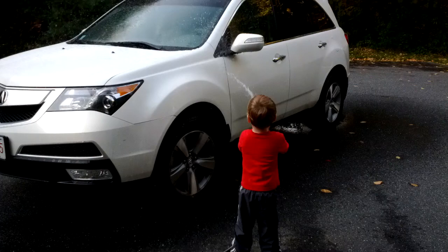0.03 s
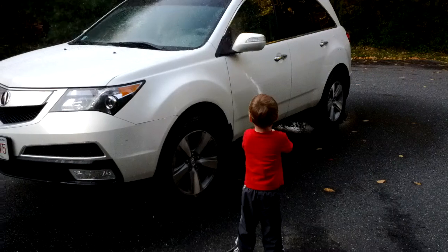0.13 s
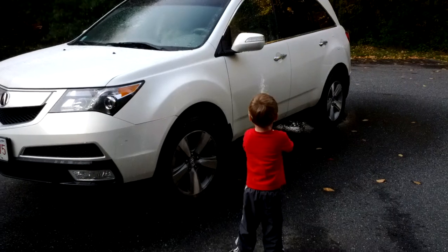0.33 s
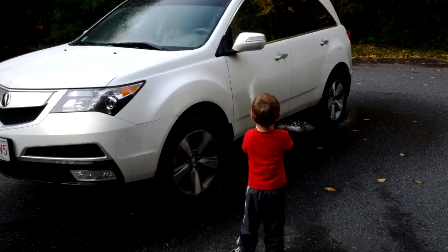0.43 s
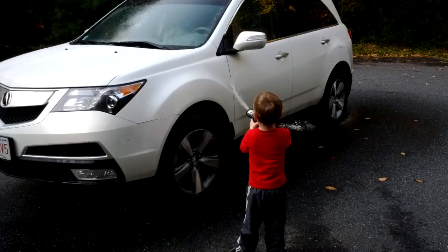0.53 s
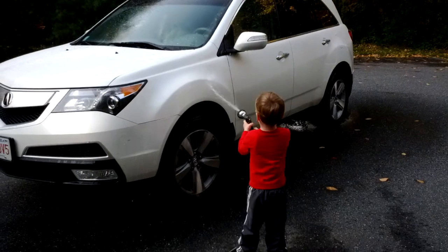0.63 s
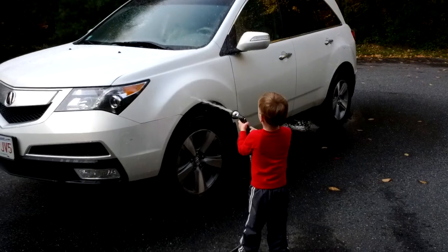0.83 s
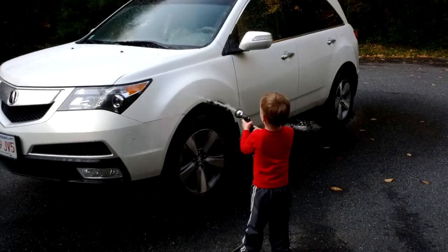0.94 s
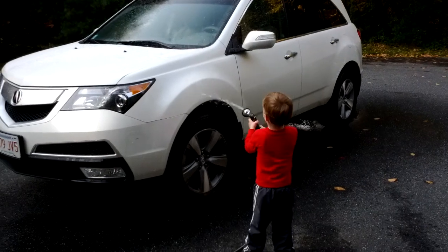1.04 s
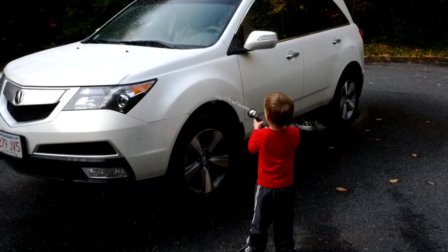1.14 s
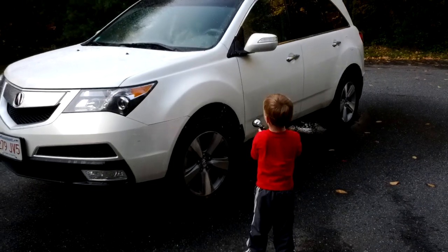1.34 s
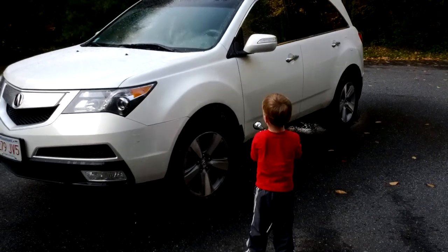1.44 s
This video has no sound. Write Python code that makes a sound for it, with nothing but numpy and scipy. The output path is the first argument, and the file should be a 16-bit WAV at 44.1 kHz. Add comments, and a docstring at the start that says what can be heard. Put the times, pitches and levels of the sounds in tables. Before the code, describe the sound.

A hose jet hits car panels, first a hollow, hissy patter on the door, then louder metallic drumming on the fender, finally weak drips in the wheel arch. Open air, close microphone, soft low rumble.

```python
"""A garden hose sprays a parked car outdoors, over a low rumble.
Drops burst on the paint in a bright, uneven crackle of noise puffs and tiny ringing bubbles over mist.
The jet swings from the door to the front fender, which drums under it, then into the wheel arch,
where only a thin spatter is left. Panels are resonant modes struck by random drops.
Fat drops ping and slugs of water slap the arch's rim; the rumble is filtered noise."""
import sys
import numpy as np
from scipy import signal
from scipy.fft import rfft, irfft, next_fast_len
from scipy.io import wavfile

SR = 44100
rng = np.random.default_rng(int(sys.argv[2]) if len(sys.argv) > 2 else 0)


def persist_wave(psi):
    """Save psi, clipped to +-1, as 16-bit WAV."""
    counts = np.round(np.clip(psi, -1, 1) * 32767).astype(np.int16)
    wavfile.write(sys.argv[1], SR, np.atleast_2d(counts).T)


N = 66150
T = np.arange(N) / SR


def from_db(db):
    """Decibels to gain."""
    return 10 ** (np.asarray(db) / 20)


def rms_one(x):
    """Scale to rms 1."""
    return x / np.sqrt(np.mean(x ** 2) + 1e-20)


def level(rows):
    """Gain per sample from a (time_s, level_db) curve."""
    return from_db(np.interp(T, *np.transpose(rows)))


def noise():
    """White noise of rms about 1."""
    return rng.standard_normal(N)


def drift(hz):
    """Slow random wander of rms 1: noise through two equal one-pole lowpasses."""
    r = np.exp(-2 * np.pi * hz / SR)
    wander = signal.lfilter([1], [1, -2 * r, r * r], rng.standard_normal(2 * N))
    return rms_one(wander[N:])  # first half is run-in


def colour(x, points):
    """Minimum-phase filter through (freq_hz, density_db) points; white noise keeps its power."""
    size = 2 * next_fast_len(N)
    point_hz, point_db = np.transpose(points)
    bin_hz = np.arange(size // 2 + 1) * SR / size
    gain = rms_one(from_db(np.interp(np.log(bin_hz + 1), np.log(point_hz), point_db)))
    # folding the cepstrum makes the filter causal
    cepstrum = irfft(np.log(gain))
    cepstrum[1:size // 2] *= 2
    cepstrum[size // 2 + 1:] = 0
    return irfft(rfft(x, size) * np.exp(rfft(cepstrum)))[:N]


DROP_SPREAD_DB, SIZE_LIMIT = 3, 2.4  # size spread; largest drop in spreads


def impacts(per_s, spread_db):
    """Random impacts of uneven size, with mean power about 1 at any rate."""
    chance = np.clip(per_s / SR, 1e-6, 1)
    sizes = rms_one(from_db(spread_db * np.minimum(noise(), SIZE_LIMIT)))
    return (rng.random(N) < chance) * sizes / np.sqrt(chance)


def random_signs():
    """Random polarity per sample."""
    return rng.choice([-1, 1], N)


def bursts(hits, decay_s):
    """Each impact sets off a short dying puff of noise of the same mean energy."""
    r = np.exp(-2 / (decay_s * SR))  # power decays twice as fast as amplitude
    power = signal.lfilter([1 - r], [1, -r], hits ** 2 + 1e-18)
    return np.sqrt(power) * noise()


def resonate(x, hz, t60_s):
    """Two-pole resonance; returns its output and pole radius."""
    r = from_db(-60 / (t60_s * SR))
    w = 2 * np.pi * hz / SR
    return signal.lfilter([1, 0, -1], [1, -2 * r * np.cos(w), r * r], x), r


# how strongly the jet breaks into clumps: time_s, spread_db
CLUMPING = [(.12, 1.5), (.45, 2.5), (.7, 1.46), (1, 2), (1.2, 3), (1.5, 2.1)]


def jet_clumps():
    """The jet breaks into clumps: a log-level wander of varying spread, rms 1."""
    return rms_one(level(CLUMPING) ** drift(hz=55))


PING_CYCLES = 28.5  # cycles to fall 60 dB


def pings(per_s):
    """Tiny bubbles in the water film ring briefly, each at one of 14 pitches."""
    hits = impacts(per_s, DROP_SPREAD_DB) * random_signs()
    pitches_hz = np.linspace(4500, 15000, 14)
    dealt = rng.integers(0, len(pitches_hz), N)
    out = np.zeros(N)
    for k, hz in enumerate(pitches_hz):
        ring, r = resonate(hits * (dealt == k) + 1e-18, hz, PING_CYCLES / hz)
        out += np.sqrt(1 - r * r) * ring  # evens out the energy across pitches
    return out / 2


# spatter on the paint, before the layer levels: time_s, level_db
SPATTER_LEVEL = [(.12, -29), (.19, -29.5), (.3, -29.5), (.42, -25.5), (.49, -24.5), (.54, -25), (.66, -21),
                 (.78, -21.5), (.85, -24), (.9, -23), (.95, -24.5), (1.03, -24.5), (1.15, -31), (1.22, -36),
                 (1.28, -44), (1.37, -40.5), (1.42, -46.5), (1.455, -41.5), (1.5, -46)]
# relative spectrum of bursting drops: freq_hz, density_db
DROP_COLOUR = [(300, -32.5), (2000, -32), (2700, -25.5), (4000, -18.5), (5200, -17), (7000, -9.5),
               (8400, -9), (10200, 0), (11300, -1), (12500, -4.5), (14200, -12.5), (16000, -18)]
DROPS_PER_S, DROP_DECAY_S = 2600, 0.000056  # rate at full flow; decay of one burst
RATE_FOLLOWS = 0.4  # exponent of drop rate against level
DROPS_DB, PINGS_DB, MIST_DB = -3.5, -3.5, -9


def spatter(clumps):
    """Small drops and bubbles crackle over a fine mist; they thin out as the spatter weakens."""
    flow = level(SPATTER_LEVEL)
    per_s = DROPS_PER_S * (flow / flow.max()) ** RATE_FOLLOWS
    drops = from_db(DROPS_DB) * bursts(impacts(per_s, DROP_SPREAD_DB), DROP_DECAY_S)
    bubbles = from_db(PINGS_DB) * pings(per_s)
    mist = from_db(MIST_DB) * noise()
    return colour(flow * (clumps * (drops + bubbles) + mist), DROP_COLOUR)


# dull splash of the jet's core: time_s, level_db
SPLASH_LEVEL = [(.12, -45), (.35, -50), (.52, -42.5), (.62, -41), (.68, -35), (.75, -37.5), (.82, -35.5),
                (.87, -43), (.91, -38), (.96, -42), (1.04, -41.5), (1.17, -49.5), (1.29, -61.5), (1.5, -59)]
# relative spectrum of the splash: freq_hz, density_db
SPLASH_COLOUR = [(100, -24), (300, -3), (850, 0), (1300, -4.5), (2100, -4), (2700, -4.5), (4300, -1.5),
                 (6000, -17), (12000, -16.5)]


def splash(clumps):
    """The core of the jet lands as a dense, dull patter, steadier than the loose drops."""
    hits = impacts(per_s=3500, spread_db=0.5) * random_signs()
    return colour(level(SPLASH_LEVEL) * np.sqrt(clumps) * hits, SPLASH_COLOUR)


# single fat drops, reference for the three levels below: start_s, level_db
FAT_DROPS = [(.1265, -20), (0.131, -14), (0.2295, -22), (.2412, -19), (.2515, -9), (0.3379, -4.5),
             (0.3508, -5.5), (0.3852, -4), (.4128, -7), (.4649, 0.5), (0.4994, -9), (.5234, -8),
             (.5863, -4), (0.668, 0.5), (.671, 1.5), (0.7701, -4.5), (.8835, -5), (1.0049, -2), (1.007, -3),
             (1.1427, -9), (1.1444, -9), (1.1828, -5), (1.1945, -25), (1.2144, -17.5), (1.2155, -18),
             (1.2223, -10), (1.225, -16), (1.3058, -13.5), (1.376, -27), (1.4545, -29), (1.46, -30)]
FAT_PING_DB, FAT_TICK_DB, FAT_SPLAT_DB = -4, -20, -14
FAT_SWELL_S, FAT_PING_HZ, FAT_PITCH_SPREAD = 0.00016, 11100, 0.035  # spread as share of pitch


def fat_drops():
    """A fat drop snaps: a sharp tick, then a few cycles of a very high ping inside a splat of noise."""
    out, splat = np.zeros(N), np.zeros(N)
    for start_s, level_db in FAT_DROPS:
        age_s = np.maximum(T - start_s, 0)
        swell = from_db(level_db) * age_s / FAT_SWELL_S * np.exp(1 - age_s / FAT_SWELL_S)
        pitch_hz = FAT_PING_HZ * (1 + FAT_PITCH_SPREAD * rng.standard_normal())
        out += from_db(FAT_PING_DB) * swell * np.sin(2 * np.pi * pitch_hz * age_s)
        out[int(start_s * SR)] += from_db(level_db + FAT_TICK_DB)
        splat += swell
    return out + from_db(FAT_SPLAT_DB) * colour(splat * noise(), DROP_COLOUR)


# slaps of water on the arch's rim: start_s, level_db
SLAPS = [(0.67, -25), (1.0286, -22.5)]
SLAP_DECAY_S, SLAP_HZ, SLAP_WIDTH_HZ = 0.0019, 4400, 3200


def slaps():
    """Slugs of water hit the rim of the wheel arch: dying bursts of band noise, lower than the drops."""
    swell = np.zeros(N)
    for start_s, level_db in SLAPS:
        swell += from_db(level_db) * (T >= start_s) * np.exp(-np.abs(T - start_s) / SLAP_DECAY_S)
    b, a = signal.iirpeak(SLAP_HZ, SLAP_HZ / SLAP_WIDTH_HZ, fs=SR)
    return swell * rms_one(signal.lfilter(b, a, noise()))


HITS_PER_S = 1600  # drops heavy enough to move the panels


def panel(modes):
    """A metal sheet rings under a hail of drops, each striking every mode differently; rms 1."""
    hits = impacts(HITS_PER_S, DROP_SPREAD_DB)
    out = np.zeros(N)
    for hz, level_db, t60_s in modes:
        ring, _ = resonate(hits * noise(), hz, t60_s)
        out += from_db(level_db) * rms_one(ring)
    return rms_one(out)


# force of the jet on the fender, before FENDER_DB: time_s, level_db
FENDER_PUSH = [(.12, -44.5), (.33, -60), (.55, -40), (.65, -47), (.77, -32.5), (.87, -36), (.96, -37),
               (1.01, -41.5), (1.07, -40.5), (1.17, -47.5), (1.24, -49.5), (1.31, -66), (1.5, -71)]
# fender modes, relative levels: freq_hz, level_db, t60_s
FENDER_MODES = [(247.4, -11, 0.29), (480, -30, 0.065), (540, -8.5, 0.41), (567.2, 3, 0.25),
                (633.5, 1, 0.22), (749, -3, 0.29), (846, -3.5, 0.16), (1111, -8.5, 0.19), (1364, -9, 0.12),
                (1600, -11, 0.12), (2070, -7, 0.034)]
FENDER_DB = -2


def fender():
    """The fender drums under the jet in its own modes."""
    return from_db(FENDER_DB) * level(FENDER_PUSH) * panel(FENDER_MODES)


# rattle of drops on the door: time_s, level_db
DOOR_PUSH = [(.12, -45.5), (.4, -43), (.55, -55), (.7, -64), (1.2, -81)]
# door modes, relative levels: freq_hz, level_db, t60_s
DOOR_MODES = [(447, -15, 0.02), (615.5, -6.5, 0.1), (2208, -9, 0.026), (3230, -2.5, .008),
              (3730, 0.5, 0.0079)]


def door():
    """Drops rattle the door in short, mostly damped modes."""
    return level(DOOR_PUSH) * panel(DOOR_MODES)


# hollow ring of the wheel arch: time_s, level_db
ARCH_LEVEL = [(.12, -59.5), (.6, -57), (.8, -51.5), (.97, -70), (1.07, -46), (1.17, -47.5), (1.27, -69.5),
              (1.5, -86)]
# arch modes, relative levels: freq_hz, level_db, t60_s
ARCH_MODES = [(399.2, -2, 0.4), (435, -7, 0.15)]


def wheel_arch():
    """The wheel arch rings hollow in two struck modes."""
    return level(ARCH_LEVEL) * panel(ARCH_MODES)


# low boom of the bodywork: time_s, level_db
BOOM_LEVEL = [(.12, -51.5), (.31, -58), (.39, -41.5), (.46, -47.5), (.53, -46.5), (.64, -43.5), (.75, -53),
              (1.05, -57.5), (1.3, -61.5), (1.36, -50.5), (1.5, -59)]
# low bodywork modes, relative levels: freq_hz, level_db, t60_s
BOOM_MODES = [(149.7, -0.5, 0.18), (188, -6, 0.057)]


def body_boom():
    """The bodywork booms in two low struck modes."""
    return level(BOOM_LEVEL) * panel(BOOM_MODES)


HOLLOW_HZ, HOLLOW_WIDTH_HZ = 2770, 700
HOLLOW_UNTIL_S, HOLLOW_FADE_S = 0.63, 0.11  # the fade ends at HOLLOW_UNTIL_S
HOLLOW_DEPTH, HOLLOW_WAVER = 0.41, 0.24  # mean share of the notch; rms wavering


def hollow(x):
    """Jet on the door sounds hollow: a wavering spectral dip that fills as the jet swings away."""
    b, a = signal.iirnotch(HOLLOW_HZ, HOLLOW_HZ / HOLLOW_WIDTH_HZ, fs=SR)
    dipped = signal.lfilter(b, a, x)
    depth = np.clip(HOLLOW_DEPTH + HOLLOW_WAVER * drift(hz=8.2), 0, 1)
    on_door = np.clip((HOLLOW_UNTIL_S - T) / HOLLOW_FADE_S, 0, 1)
    return x + depth * on_door * (dipped - x)


# relative spectrum of the rumble: freq_hz, density_db
RUMBLE_COLOUR = [(15, -19), (35, 2.5), (55, 1.5), (100, -1), (155, -4), (230, -2), (330, -16.5), (800, -26),
                 (2000, -34.5), (8000, -53)]
RUMBLE_DB = -48.5


def rumble():
    """Steady low background: filtered noise."""
    return from_db(RUMBLE_DB) * rms_one(colour(noise(), RUMBLE_COLOUR))


def scene():
    """Water, car panels and background rumble, in one channel."""
    clumps = jet_clumps()
    water = spatter(clumps) + splash(clumps) + fat_drops() + slaps()
    car = fender() + door() + wheel_arch() + body_boom()
    return (hollow(water + car) + rumble())[None]


START_S, CUTOFF_HZ = 0.114, 15900  # silence before START_S


def record(dry):
    """The sound starts abruptly; a steep lowpass cuts the top."""
    steep = signal.ellip(12, 0.1, 80, CUTOFF_HZ, fs=SR, output="sos")  # ripple_db, stop_db
    return signal.sosfilt(steep, dry * (T >= START_S))


dry = scene()
out = record(dry)
persist_wave(out)
```